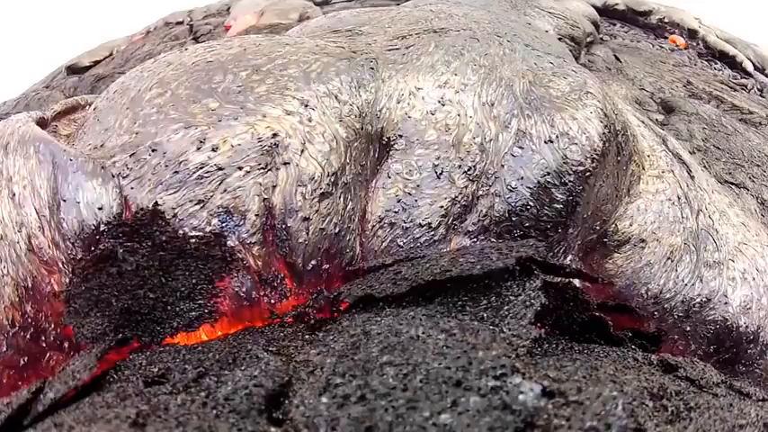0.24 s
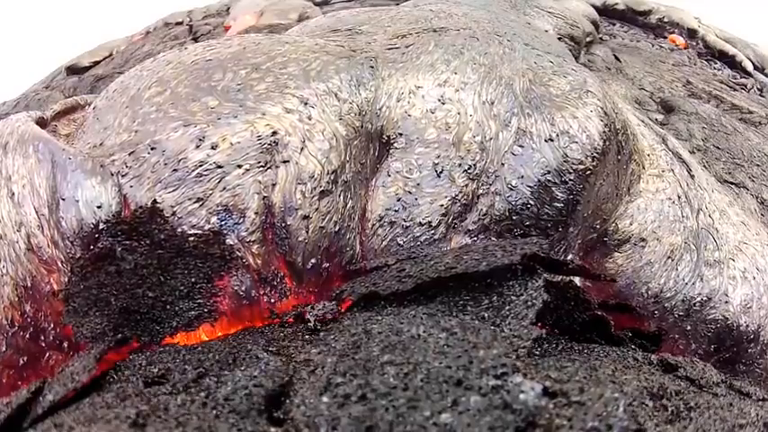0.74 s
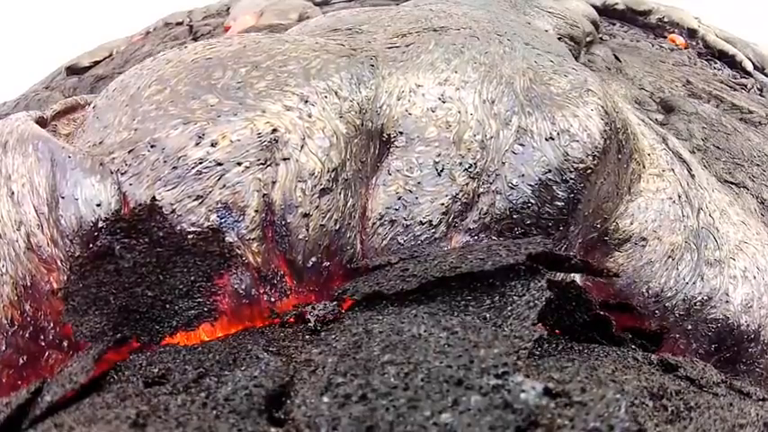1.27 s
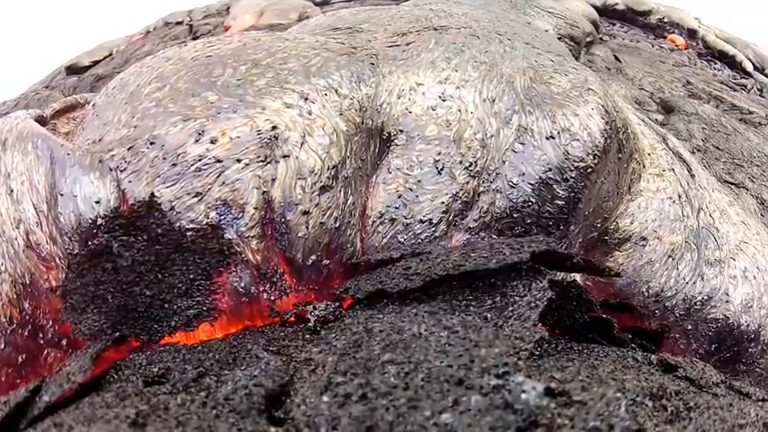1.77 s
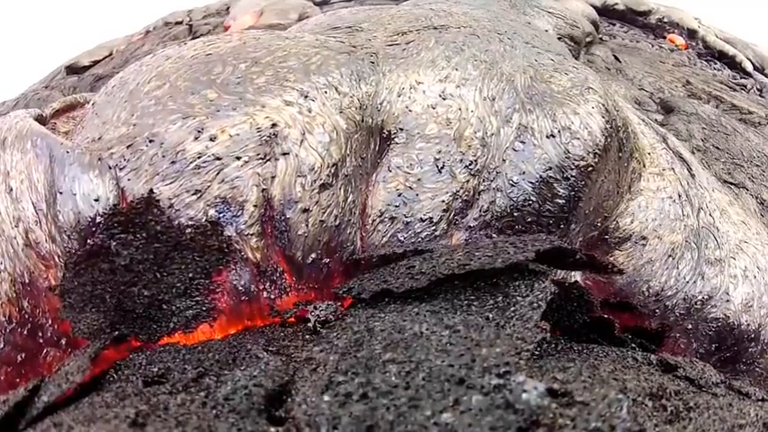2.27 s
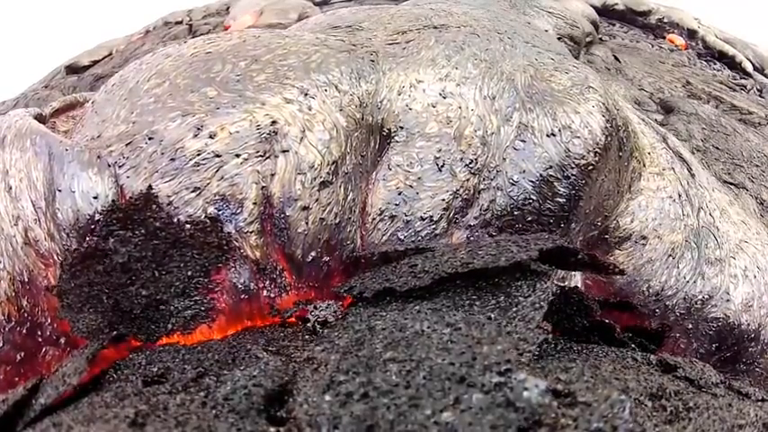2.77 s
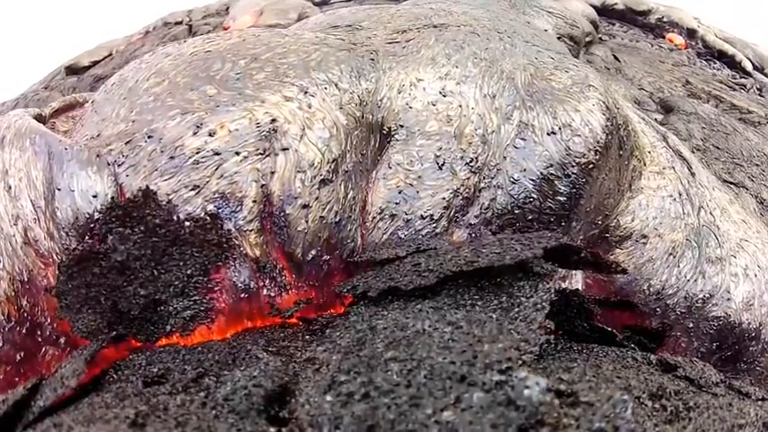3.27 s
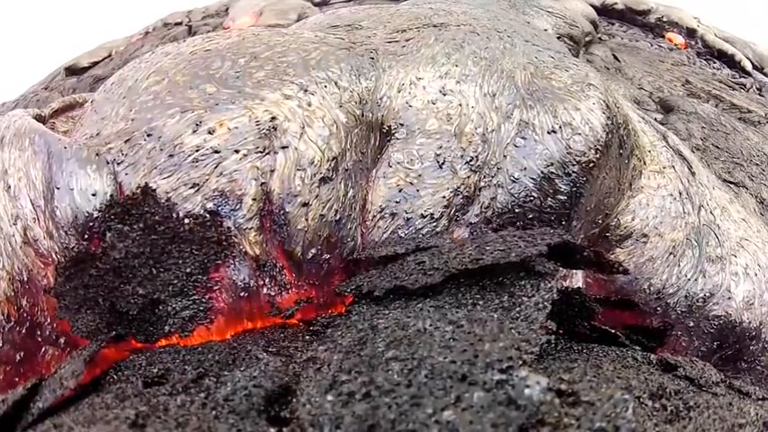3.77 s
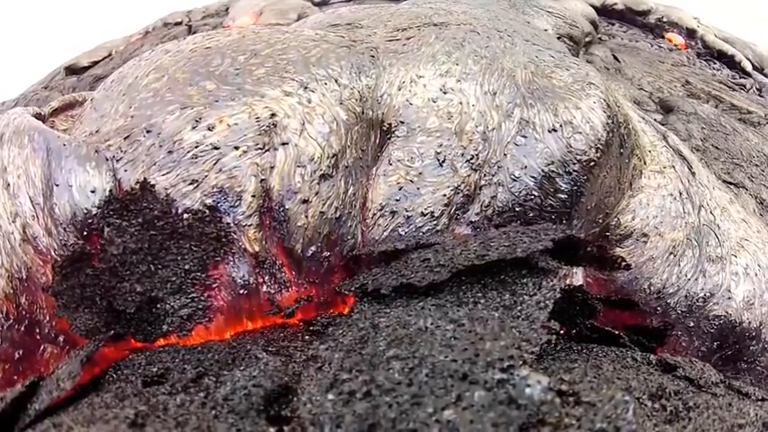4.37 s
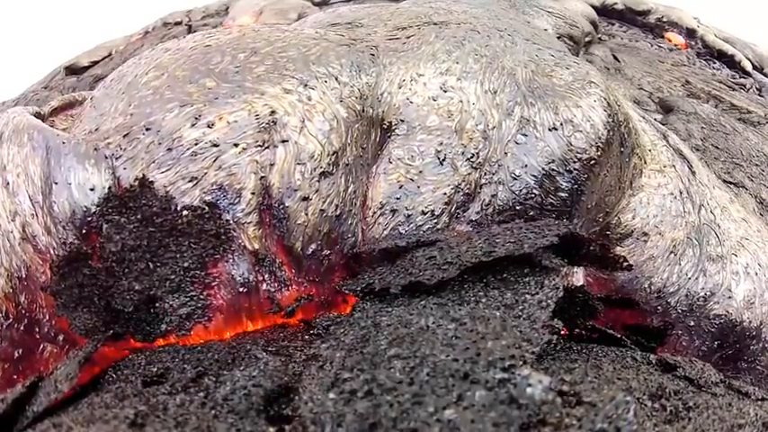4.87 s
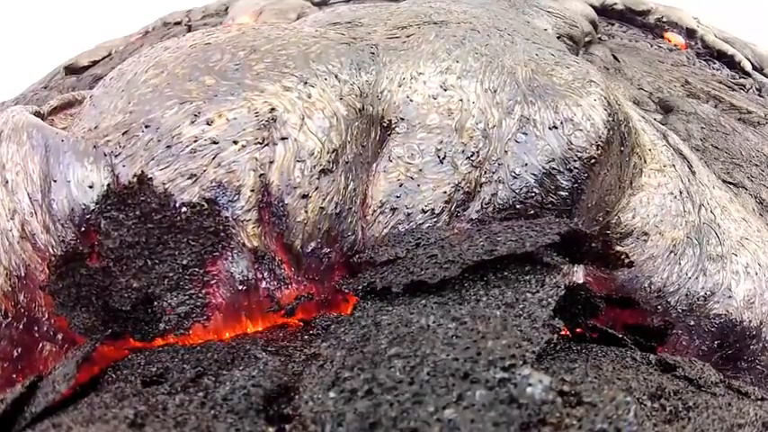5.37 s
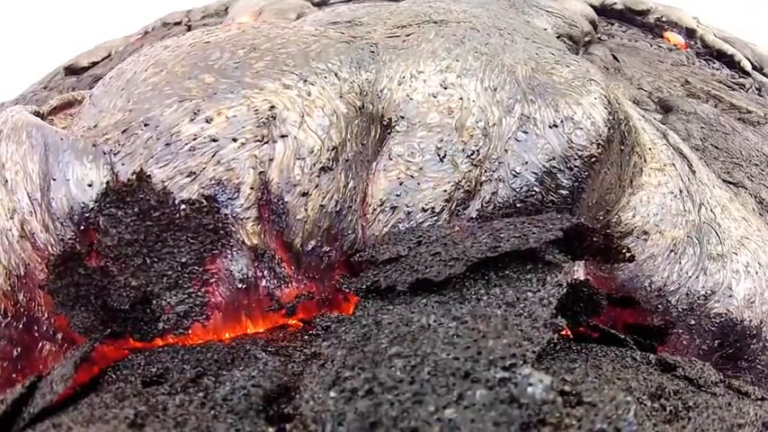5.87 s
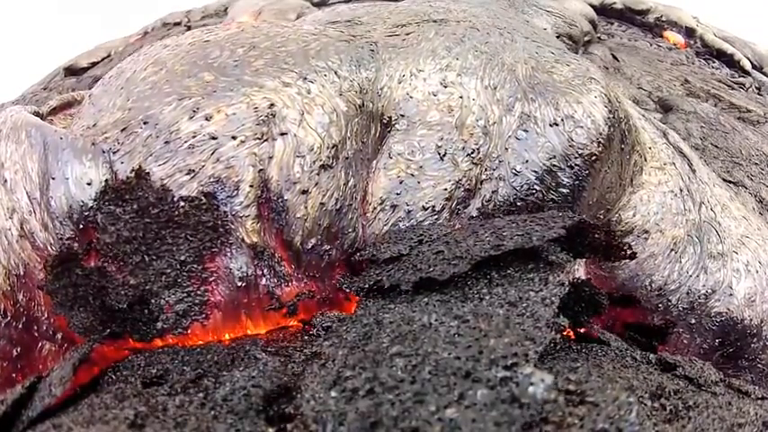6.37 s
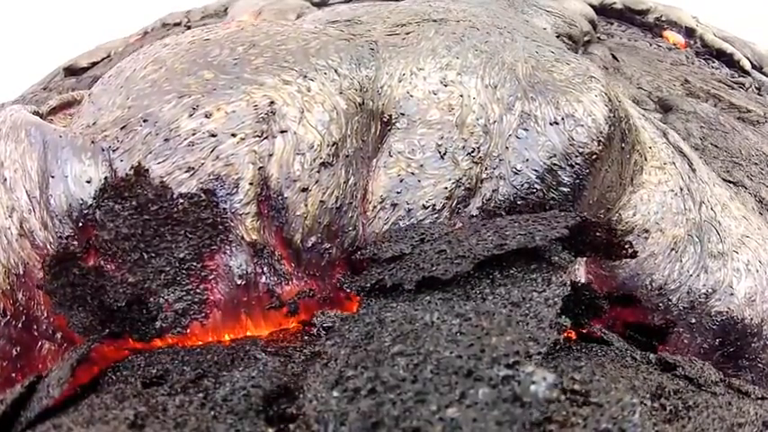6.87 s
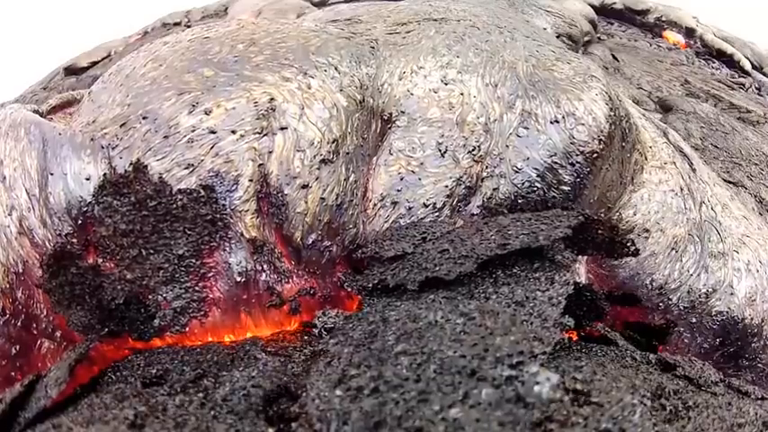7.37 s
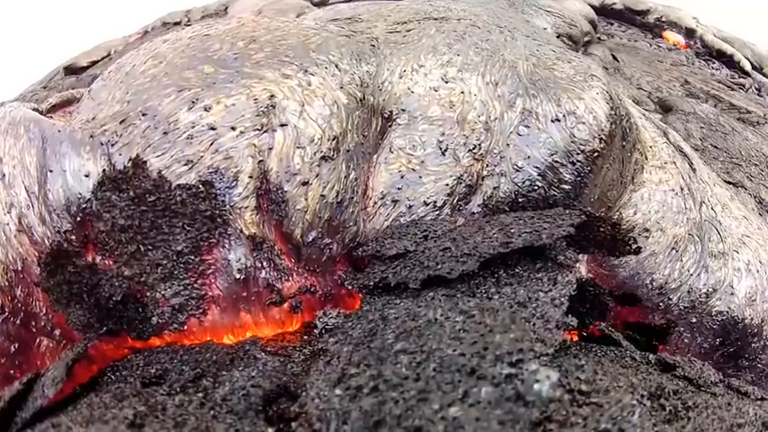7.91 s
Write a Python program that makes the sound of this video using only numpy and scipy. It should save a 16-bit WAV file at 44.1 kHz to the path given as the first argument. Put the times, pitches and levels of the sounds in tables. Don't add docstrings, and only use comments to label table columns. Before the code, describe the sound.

Brittle, glassy flakes snap and crumble close by as soft gusts buffet the microphone; a loud pop at 3.5 seconds, a muffled knock at 6.

```python
import sys
import numpy as np
from scipy import signal
from scipy.fft import rfft, irfft
from scipy.io import wavfile

SR = 44100
rng = np.random.default_rng(int(sys.argv[2]) if len(sys.argv) > 2 else 0)


def store_wav(level_fs):
    pcm = np.round(np.clip(np.atleast_2d(level_fs), -1, 1) * 32767)
    wavfile.write(sys.argv[1], SR, pcm.T.astype(np.int16))


def gain_from_decibels(decibels):
    exponent = np.asarray(decibels, float) / 20
    return 10 ** exponent


N = 358974

# (time [s], peak level [dB], length [s])
GUSTS = [(0, -42.5, .04), (0.174, -44.5, 0.066), (0.43, -52, 0.032), (0.94, -44, 0.078),
         (1.217, -40.5, 0.092), (1.478, -40, 0.026), (1.62, -41.5, 0.13), (1.78, -38.5, 0.06),
         (2.044, -38.5, 0.038), (2.172, -52, 0.089), (2.36, -39, 0.034), (2.535, -46, 0.07),
         (2.75, -48.5, .12), (3.15, -45.5, 0.043), (3.358, -51.5, 0.076), (4.25, -44, 0.071),
         (4.441, -40, 0.056), (4.94, -42.5, .06), (5.308, -47, 0.29), (5.76, -40.5, 0.1),
         (6.157, -44, 0.13), (6.534, -47, 0.074), (6.755, -48.5, 0.078), (7.164, -58, 0.09)]
# (frequency [Hz], density [dB per Hz])
WIND_SPECTRUM = [(20, -25), (35, 2), (60, 1), (120, -4), (250, -15), (500, -30.5), (1000, -43)]
# (frequency [Hz], density [dB per Hz])
HISS_SPECTRUM = [(200, 0.5), (900, -12), (1150, -22.5), (2500, -19), (4200, -23), (5400, -21.5),
                 (7000, -25)]
# (frequency [Hz], density [dB per Hz])
SIDE_SPECTRUM = [(35, -24), (60, -1), (326, -0.5), (871, -27), (1060, -20), (1430, -14.5), (4830, -8.5),
                 (5980, -18.5), (7250, -12), (10000, -29), (13000, -70), (22000, -120)]
# (time [s], level [dB])
ACTIVITY = [(0.0, -47), (0.2, -54.5), (0.34, -55), (1.13, -55.5), (1.31, -53.5), (2.27, -52), (2.4, -56.5),
            (2.76, -56.5), (3.24, -54), (4.62, -58.5), (5.42, -54), (5.87, -56.5), (6.26, -55.5),
            (7.09, -55), (7.21, -53.5), (7.71, -53), (8.05, -57.5), (8.14, -54)]
# (frequency [Hz], width [Hz], level [dB])
LOW_MODES = [(276, 120, -9), (480, 54, -3), (627, 100, -2), (770, 136, 1), (911.4, 53, -4)]
# (frequency [Hz], width [Hz], level [dB])
HIGH_MODES = [(1337, 71, -4), (1790, 73, -3.5), (2100, 120, -1.5), (2300, 220, -2.5), (2664, 350, -2.5),
              (3100, 180, -5.5), (3980, 290, -3), (4630, 540, -9)]
# (time [s], peak level [dB])
FAINT_SNAPS = [(.2189, -50), (.407, -49), (.643, -51), (1.51, -55), (1.6871, -51), (2.0128, -49),
               (2.797, -53), (3.1043, -54), (3.3408, -48), (3.3672, -48), (3.568, -59), (3.981, -52),
               (4.6555, -49), (5.0964, -53), (5.577, -52), (5.6915, -49), (5.735, -53), (5.8007, -46.5),
               (5.8611, -44), (6.0122, -53), (6.11, -55), (6.451, -54), (6.559, -48), (6.7556, -49),
               (6.8478, -53), (7.1921, -50), (7.6326, -50), (8.0486, -49)]
# (time [s], peak level [dB], top edge level [dB])
SNAPS = [(0.286, -45, -22), (0.7789, -44, -7), (0.8913, -44, -28), (1.176, -45, -20), (1.5713, -58, -8),
         (1.6248, -46, -5), (1.7974, -47, -25), (2.3965, -53, -11), (2.4725, -36, -33), (3.023, -44.5, -27),
         (3.0576, -49, -12), (3.1206, -41.5, -20), (3.2276, -38.5, -12), (3.5982, -54, -10),
         (3.839, -51, -20), (3.9082, -38, -33), (3.933, -42, -22), (3.9702, -49, -16), (4.0068, -48, -18),
         (4.252, -43.5, -13), (4.573, -45.5, -32), (5.2162, -42.5, -20), (5.5614, -35.5, -41),
         (5.8371, -45, -18), (6.608, -47, -28), (6.9497, -47.5, -25), (7.1585, -41, -35),
         (7.8358, -45, -18), (7.888, -43, -40), (7.9818, -46, -37)]
# (time [s], peak level [dB], ring [Hz])
LIGHT_TICKS = [(.2004, -51, 2040), (.6098, -41.5, 2290), (.739, -43, 2010), (1.0217, -40.5, 2100),
               (1.7195, -41.5, 2100), (2.373, -44, 1800), (2.472, -43, 2000), (3.0582, -43.5, 1740),
               (3.2271, -45, 2210), (4.185, -40, 1800), (4.572, -43, 2000), (4.6548, -50, 2540),
               (5.215, -42, 2570), (5.6146, -43, 2310), (5.6695, -40, 2270), (5.6915, -52, 2700),
               (5.837, -40, 1980), (6.5585, -45, 2090), (6.7555, -46, 2070), (7.6994, -42.5, 2100),
               (7.9808, -40, 3900)]
# (time [s], peak level [dB], ring [Hz], t60 [s])
TICKS = [(.017, -35.5, 2100, .032), (.3541, -26.5, 2196, 0.024), (1.1544, -38.5, 1790, 0.051),
         (1.3392, -40.5, 2290, 0.036), (1.4576, -32, 1830, .038), (1.6045, -33, 1780, 0.033),
         (1.6237, -28, 1610, 0.022), (1.8324, -41, 2130, .044), (1.9704, -40.5, 1830, .044),
         (2.1252, -36, 1800, .044), (2.1883, -34, 2190, 0.025), (2.2458, -34, 2100, 0.03),
         (2.798, -38, 2300, 0.048), (3.024, -39.5, 2200, .044), (3.3682, -38, 3100, .02),
         (3.7454, -41, 3050, 0.048), (3.9091, -26.5, 2340, 0.023), (5.5613, -28, 2410, 0.0096),
         (5.8648, -36, 1730, 0.048), (6.2108, -39.5, 2340, 0.049), (6.2684, -40, 2970, .044),
         (6.345, -38, 1800, 0.037), (6.6088, -34.5, 3110, 0.036), (6.7241, -40, 1810, 0.022),
         (7.1583, -36, 2040, .044), (7.1915, -31.5, 1800, 0.024), (7.3124, -42, 1800, 0.04),
         (7.455, -41.5, 2150, .044), (7.7882, -39.5, 2120, .039), (8.0503, -35, 2100, 0.054)]
# (time [s], peak level [dB], ring [Hz])
CRUMBS = [(.017, -37.5, 790), (.285, -36, 443), (.614, -35, 783), (.672, -33.5, 833), (.893, -36, 750),
          (1.101, -36.5, 892), (1.369, -36, 735), (1.917, -31.5, 840), (2.021, -36, 655), (2.099, -36, 805),
          (2.179, -34, 830), (2.245, -27, 614), (2.375, -38, 585), (2.454, -32.5, 818), (2.777, -35, 763),
          (3.483, -37, 710), (3.839, -33, 770), (3.937, -36, 785), (4.572, -32.5, 740), (4.831, -36, 744),
          (5.222, -36.5, 790), (5.756, -32, 780), (6.212, -33.5, 770), (6.341, -33, 526), (6.723, -32, 640),
          (7.008, -37, 600), (7.313, -30, 804), (7.539, -32, 480), (7.736, -33, 637), (7.963, -32, 530)]
# (time [s], peak level [dB], ring [Hz], t60 [s])
CRUNCHES = [(.199, -26, 866, 0.07), (.246, -32.5, 910, .047), (.357, -26.5, 760, 0.018),
            (0.515, -30.5, 813, 0.079), (.741, -28.5, 847, 0.073), (0.845, -31, 855, 0.053),
            (1.456, -31, 816, 0.025), (1.573, -28.5, 790, 0.018), (1.742, -30.5, 522, 0.0087),
            (2.129, -29.5, 760, 0.01), (2.252, -26.5, 820, 0.04), (2.289, -28, 715, 0.042),
            (2.704, -28.5, 730, 0.026), (2.801, -27.5, 807, 0.026), (3.393, -30, 484, 0.033),
            (3.908, -33, 836, 0.03), (5.862, -23.5, 693, 0.1), (6.05, -31, 790, 0.15),
            (6.27, -29, 767, 0.027), (6.4, -32, 776, 0.023), (6.757, -30, 800, 0.13),
            (7.114, -26.5, 910, 0.018), (7.151, -29, 790, 0.039), (7.191, -30, 803, 0.042),
            (7.287, -31, 864, 0.024), (7.47, -27, 587, 0.011), (7.625, -30.5, 540, 0.06),
            (7.75, -31, 486, 0.092), (7.981, -26.5, 810, 0.02), (8.046, -27.5, 742, 0.11)]
# (time [s], modes as (frequency [Hz], level [dB], t60 [s]))
KNOCK = (6.0082, [(411, -18.5, 0.01), (1800, -48, 0.0037)])
# (time [s], modes as (frequency [Hz], level [dB], t60 [s]))
CRACK = (3.5456, [(206, -41, .05), (523, -8.5, 0.0067), (2100, -8, 0.0013), (4100, -10, 0.0029)])

CALM_DB, DYING_S, DYING_DB_PER_S = -53.5, 6.93, 12
HISS_DB, SIDE_DB = -61.5, -83
CRUNCH_BED_DB, TICK_BED_DB = 1, -63.5
TICKS_FOLLOW_CRUST, TICKS_FOLLOW_WIND = 0.53, 0.073
FAINT_EDGE_DB, LIGHT_T60_S, CRUMB_T60_S = -19.5, 0.038, 0.025
BOUNCE_S, BOUNCE_DB = .00049, 2.5
EDGE_HZ, HELD_RATE, HOLD, TOP_HZ = 5260, 12000, 4, 15100


def rms_one(x):
    return x / np.sqrt(np.mean(x ** 2) + 1e-20)


def peak_at(x, level_db):
    return x * gain_from_decibels(level_db) / np.max(np.abs(x))


def add(out, s, sound):
    at = int(s * SR)
    out[at:at + len(sound)] += sound[:N - at]


def drift(rate_hz):
    r = np.exp(-2 * np.pi * rate_hz / SR)
    noise = rng.standard_normal(N + SR)
    return rms_one(signal.lfilter([1], [1, -2 * r, r * r], noise)[SR:])


def coloured(spectrum):
    hz, level_db = np.transpose(spectrum)
    bins = np.fft.rfftfreq(N, 1 / SR) + 1
    gain = gain_from_decibels(np.interp(np.log(bins), np.log(hz), level_db, left=-60, right=-60))
    return rms_one(irfft(rfft(rng.standard_normal(N)) * gain, N))


def ring(clicks, hz, t60):
    r, w = gain_from_decibels(-60 / (t60 * SR)), 2 * np.pi * hz / SR
    return signal.lfilter([0, np.sin(w)], [1, -2 * r * np.cos(w), r * r], clicks + 1e-18)


def housing(clicks, modes, uneven_db, share=1):
    out = np.zeros(len(clicks))
    for k, (hz, width, level_db) in enumerate(modes):
        strength = gain_from_decibels(level_db + uneven_db * rng.standard_normal(len(clicks)))
        struck = rng.random(len(clicks)) < share
        t60 = np.log(1000) / (np.pi * width)
        sign = (-1) ** k
        out += sign * np.sqrt(width) * ring(clicks * strength * struck, hz, t60)
    return out


def grit(length, per_s, spread_db):
    sizes = gain_from_decibels(spread_db * np.minimum(rng.exponential(1, length), 3))
    signs = rng.choice([-1, 1], length)
    return sizes * signs * (rng.random(length) < per_s / SR)


def breakup(t60, per_s, rise_s, first):
    t = np.arange(int(.1 * SR)) / SR
    swell = 1 - np.exp(-t / rise_s)
    clicks = grit(len(t), per_s, spread_db=2.5) * swell * gain_from_decibels(-60 * t / t60)
    clicks[0] = first
    return clicks


def hiss():
    return gain_from_decibels(HISS_DB) * coloured(HISS_SPECTRUM)


def gusts():
    t = np.arange(0, N + 64, 64) / SR
    power = gain_from_decibels(CALM_DB - DYING_DB_PER_S * np.clip(t - DYING_S, 0, .5)) ** 2
    for s, peak_db, length in GUSTS:
        power = power + gain_from_decibels(peak_db) ** 2 * np.exp(-((t - s) / length) ** 2)
    return np.interp(np.arange(N) / SR, t, 10 * np.log10(power))


def wind(level_db):
    lumps = gain_from_decibels(1.6 * drift(5.0))
    return gain_from_decibels(level_db) * rms_one(coloured(WIND_SPECTRUM) * lumps)


def crackle_bed(crunch_db, tick_db):
    clump = 1.6 * np.tanh(drift(35) / 1.6)
    clicks = grit(N, 1400 * gain_from_decibels(3 * clump), spread_db=4.0) * gain_from_decibels(1.66 * clump)
    low = rms_one(housing(clicks, LOW_MODES, uneven_db=4, share=.6))
    high = rms_one(housing(clicks, HIGH_MODES, uneven_db=3.0, share=.3))
    return gain_from_decibels(crunch_db + 1.5) * low + gain_from_decibels(tick_db) * high


def snaps():
    out = np.zeros(N)
    for s, peak_db, edge_db in SNAPS + [row + (FAINT_EDGE_DB,) for row in FAINT_SNAPS]:
        clicks = breakup(0.0084, 1700, rise_s=0.00035, first=3.7)
        body = rms_one(ring(clicks, 4100, .004)) + .7 * rms_one(ring(clicks, 3000, .002))
        edge = ring(clicks, 5100, 0.0028)
        add(out, s, peak_at(body, peak_db + 5.5) + peak_at(edge, peak_db + edge_db + 15.0))
    return out


def ticks():
    out = np.zeros(N)
    for s, peak_db, hz, t60 in TICKS + [row + (LIGHT_T60_S,) for row in LIGHT_TICKS]:
        t60 = np.clip(0.71 * t60, .004, .024)
        clicks = breakup(t60, 2300, rise_s=0.00081, first=2.6)
        body = rms_one(housing(clicks, HIGH_MODES[:6], uneven_db=10))
        pitch = rms_one(ring(clicks, hz, 1.1 * t60))
        add(out, s, peak_at(t60 / 0.03 * body + pitch, peak_db - 5.0))
    return out


def crunches():
    out = np.zeros(N)
    for s, peak_db, hz, t60 in CRUNCHES + [row + (CRUMB_T60_S,) for row in CRUMBS]:
        clicks = breakup(np.clip(1.05 * t60, .01, .2), 3000, rise_s=0.0016, first=1.43)
        body = rms_one(housing(clicks, LOW_MODES, uneven_db=13))
        low = body + 1.4 * rms_one(ring(clicks, hz, 0.05))
        high = housing(clicks, HIGH_MODES, uneven_db=14.5)
        add(out, s, peak_at(low, peak_db - 4.5) + peak_at(high, peak_db - 18))
    return out


def shards():
    out = np.zeros(N)
    clicks = breakup(0.022, 3000, rise_s=.002, first=0)
    rattle = housing(clicks, LOW_MODES + HIGH_MODES[:5], uneven_db=11.0)
    add(out, CRACK[0] + 0.0022, peak_at(rattle, -35.5))
    return out


def blow(s, modes):
    out, push = np.zeros(N), np.zeros(SR // 10)
    push[0] = -1
    bounced = push + gain_from_decibels(BOUNCE_DB) * np.roll(push, round(BOUNCE_S * SR))
    rings = np.zeros(len(push))
    for hz, level_db, t60 in modes:
        rings += gain_from_decibels(level_db) * ring(bounced if hz > 1000 else push, hz, t60)
    port = signal.butter(1, 220, "high", fs=SR, output="sos")
    add(out, s, signal.sosfilt(port, rings))
    return out


def scene():
    activity_db = np.interp(np.arange(N) / SR, *np.transpose(ACTIVITY))
    wind_db = gusts()
    crust_swing = TICKS_FOLLOW_CRUST * (activity_db - activity_db.mean())
    wind_swing = TICKS_FOLLOW_WIND * (wind_db - wind_db.mean())
    air = hiss() + wind(wind_db)
    bed = crackle_bed(activity_db + CRUNCH_BED_DB, TICK_BED_DB + crust_swing + wind_swing)
    flakes = snaps() + ticks() + crunches()
    blows = shards() + blow(*KNOCK) + blow(*CRACK)
    mono = air + bed + flakes + blows
    return np.stack([mono, mono])


def top_cut(x):
    return signal.sosfilt(signal.butter(12, 16510, fs=SR, output="sos"), x)


def record(dry):
    cut = signal.sosfilt(signal.butter(8, EDGE_HZ, fs=SR, output="sos"), dry[0])
    sample_at = np.arange(N * HELD_RATE // SR + 2) * SR / HELD_RATE
    slow = np.interp(sample_at, np.arange(N), cut)
    held = signal.resample_poly(np.repeat(slow, HOLD), SR // 300, HOLD * HELD_RATE // 300)[:N]
    held = signal.sosfilt(signal.cheby2(12, 40, TOP_HZ + 600, fs=SR, output="sos"), held)
    side = gain_from_decibels(SIDE_DB + 4.3 * drift(1.9)) * coloured(SIDE_SPECTRUM)
    return top_cut(np.stack([held + side, held - side]))


dry = scene()
out = record(dry)
store_wav(out)
```